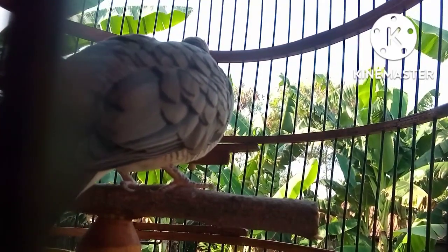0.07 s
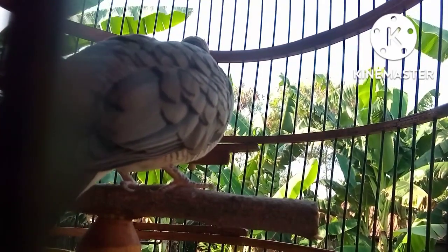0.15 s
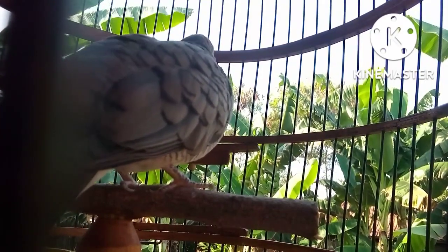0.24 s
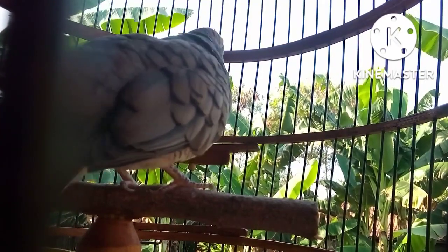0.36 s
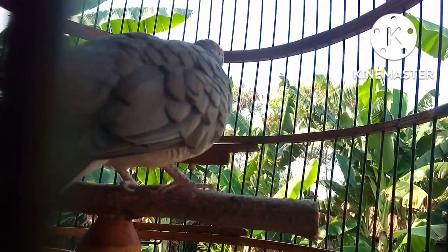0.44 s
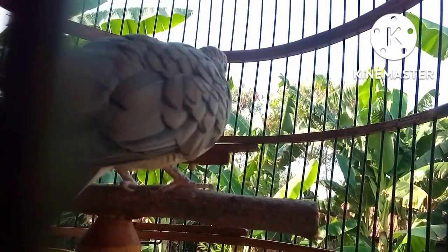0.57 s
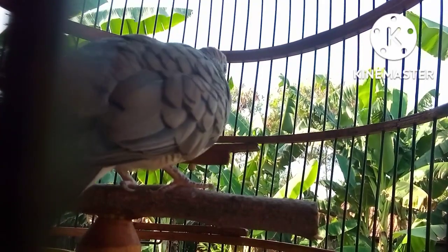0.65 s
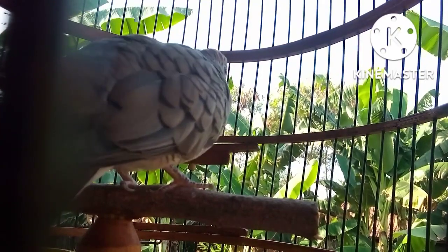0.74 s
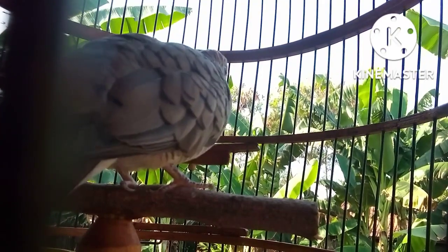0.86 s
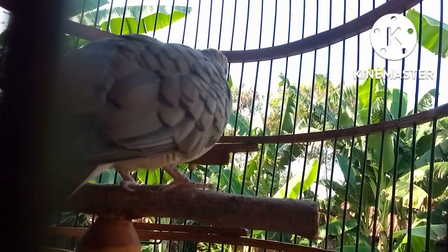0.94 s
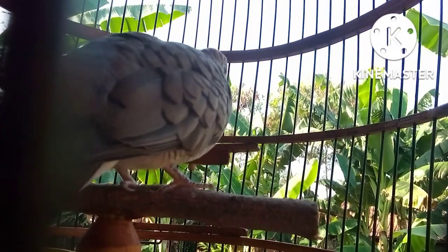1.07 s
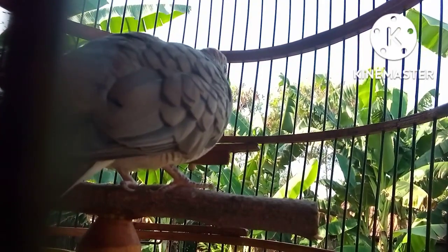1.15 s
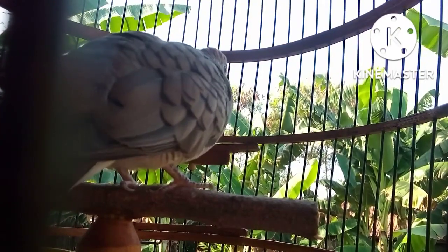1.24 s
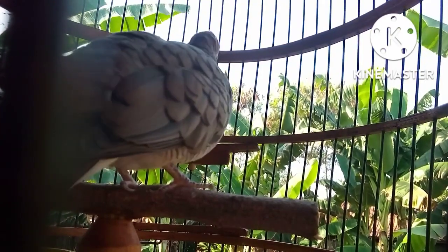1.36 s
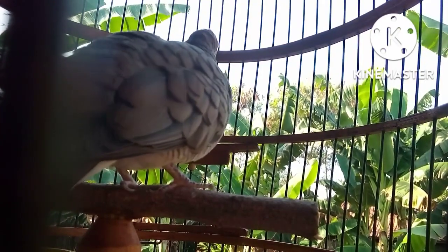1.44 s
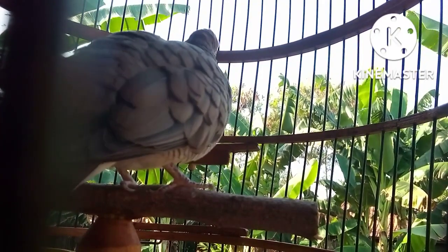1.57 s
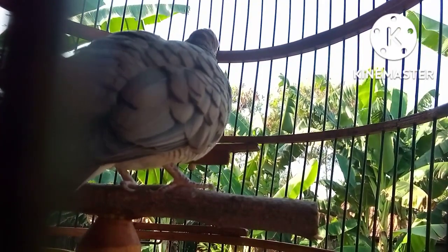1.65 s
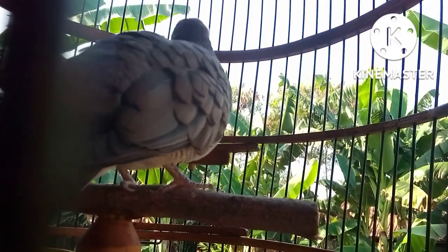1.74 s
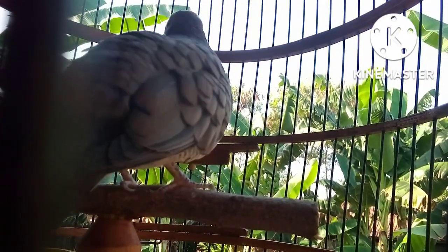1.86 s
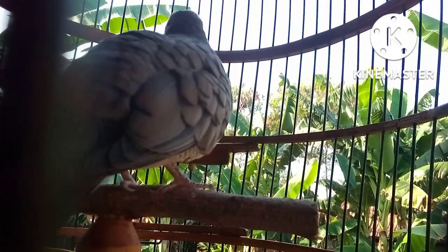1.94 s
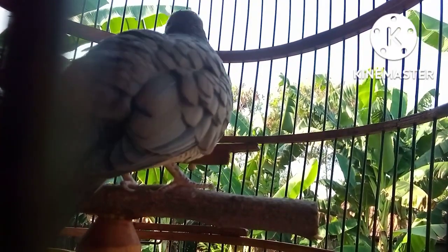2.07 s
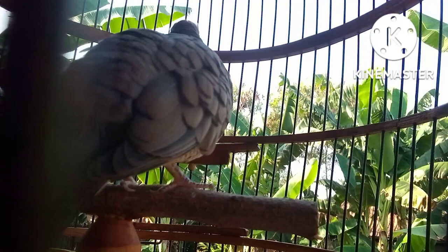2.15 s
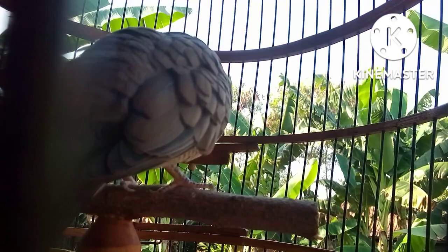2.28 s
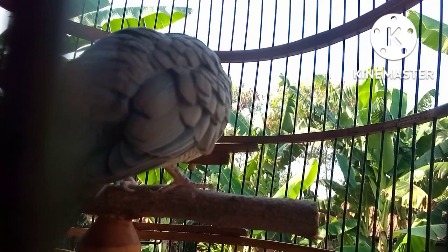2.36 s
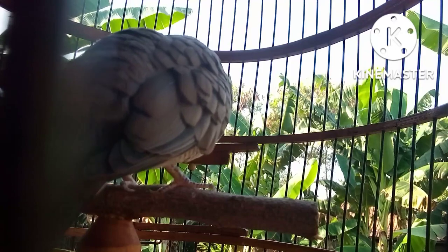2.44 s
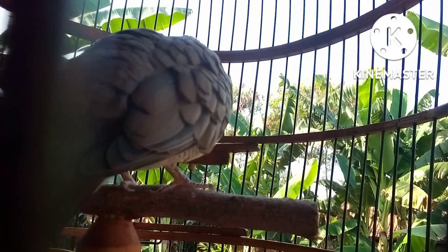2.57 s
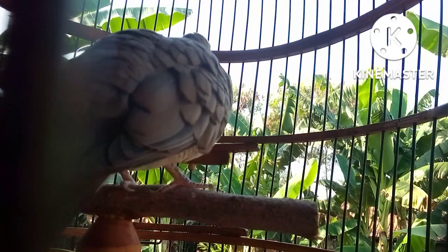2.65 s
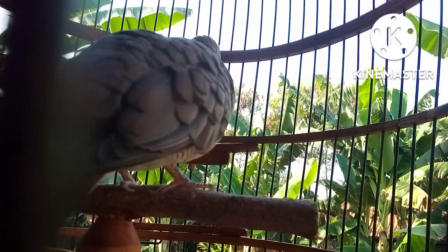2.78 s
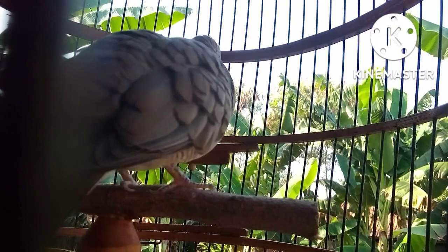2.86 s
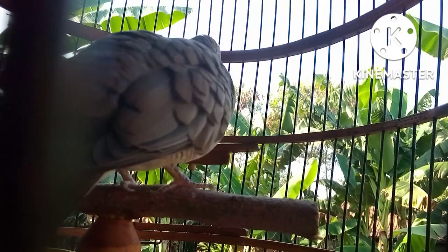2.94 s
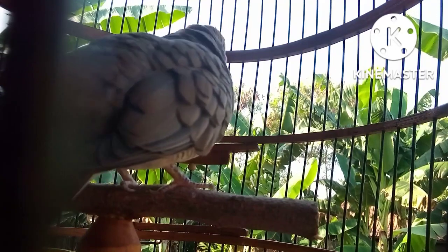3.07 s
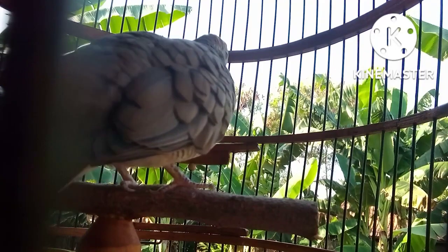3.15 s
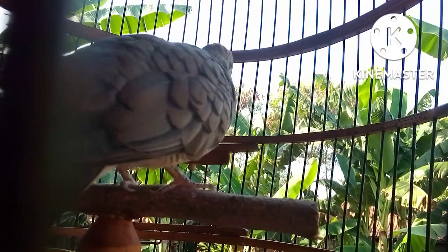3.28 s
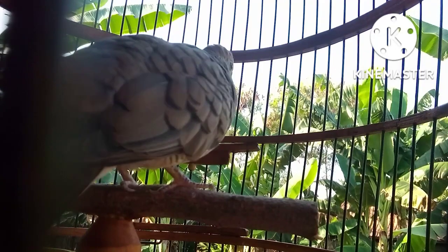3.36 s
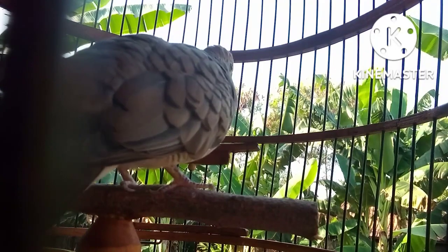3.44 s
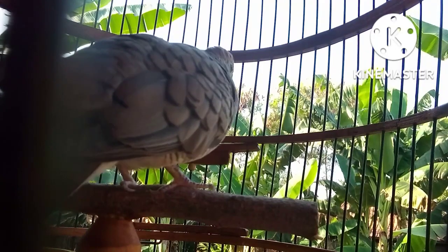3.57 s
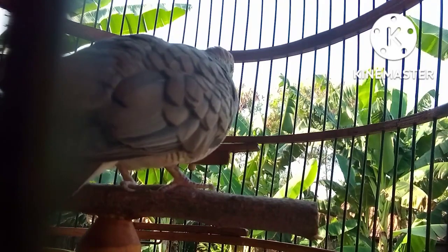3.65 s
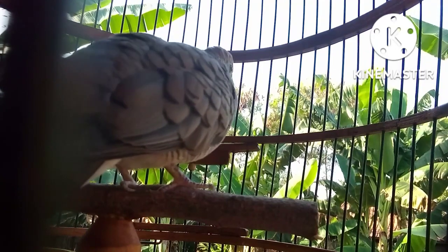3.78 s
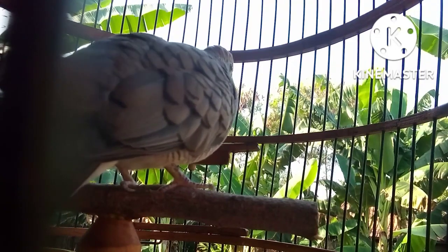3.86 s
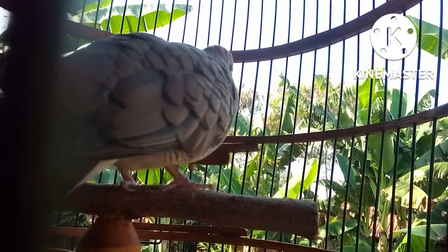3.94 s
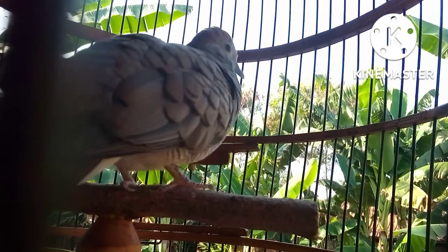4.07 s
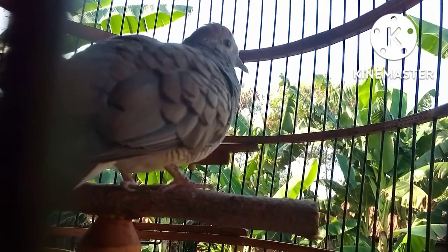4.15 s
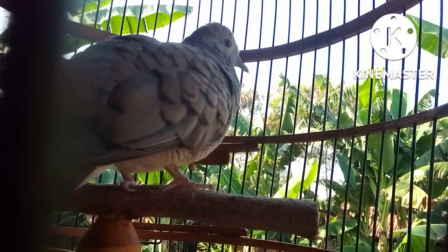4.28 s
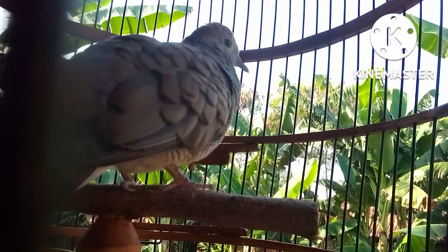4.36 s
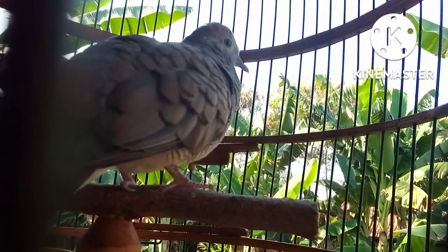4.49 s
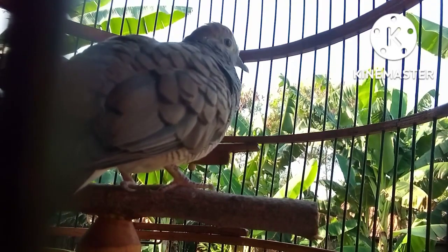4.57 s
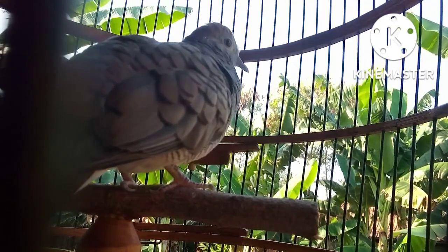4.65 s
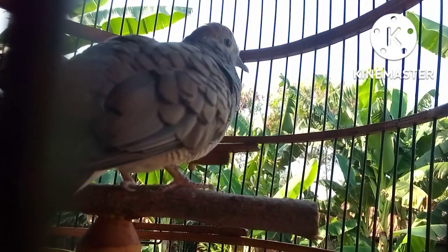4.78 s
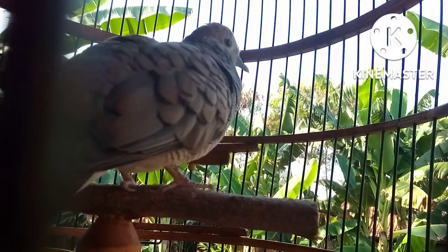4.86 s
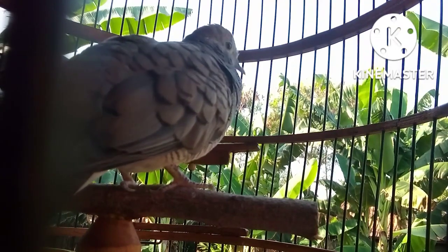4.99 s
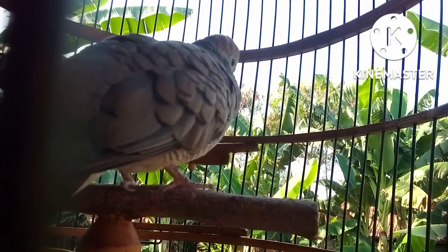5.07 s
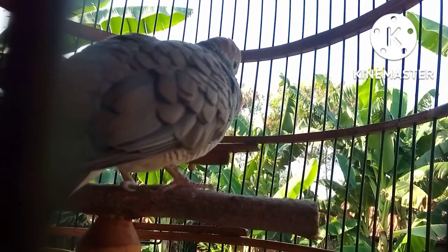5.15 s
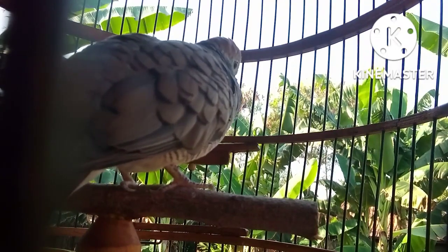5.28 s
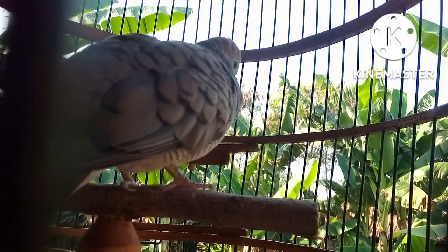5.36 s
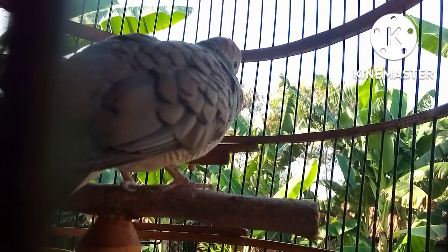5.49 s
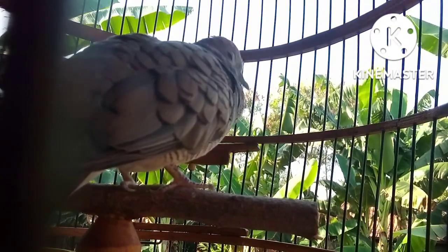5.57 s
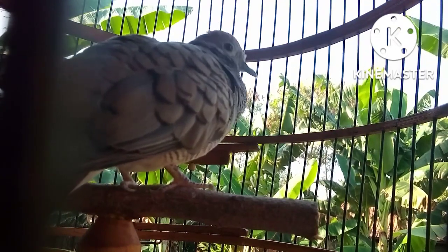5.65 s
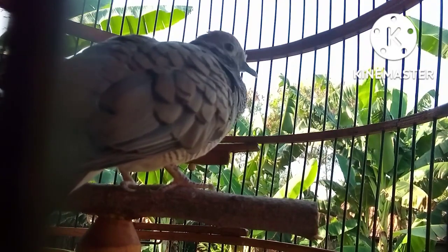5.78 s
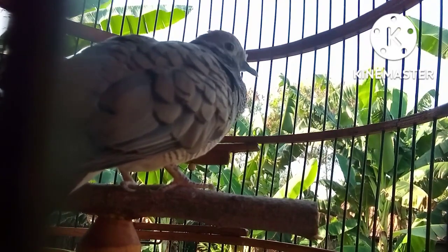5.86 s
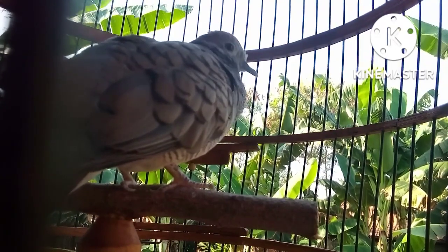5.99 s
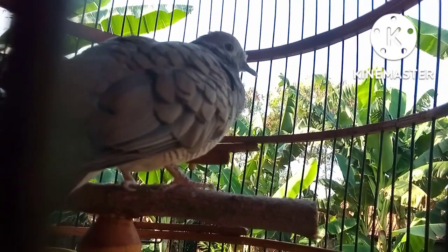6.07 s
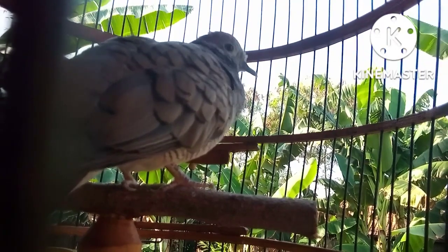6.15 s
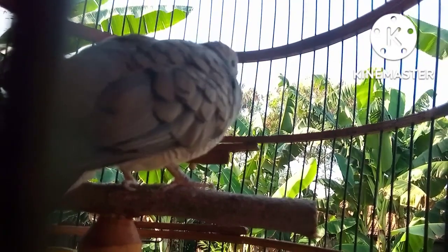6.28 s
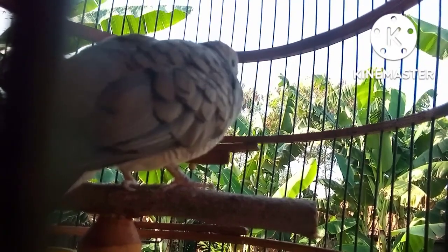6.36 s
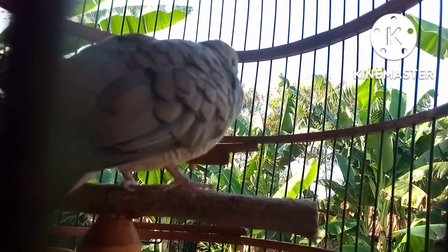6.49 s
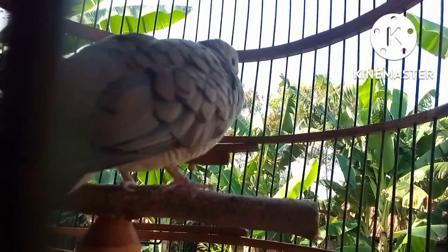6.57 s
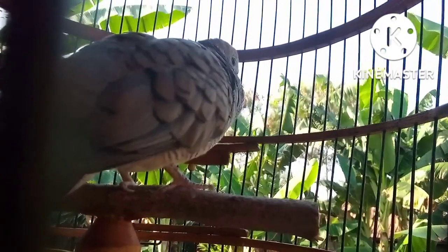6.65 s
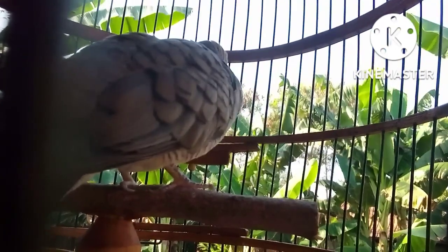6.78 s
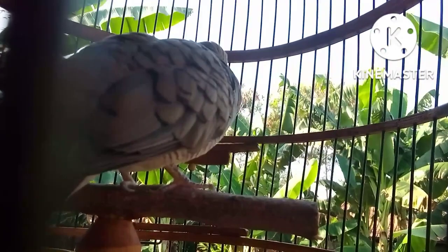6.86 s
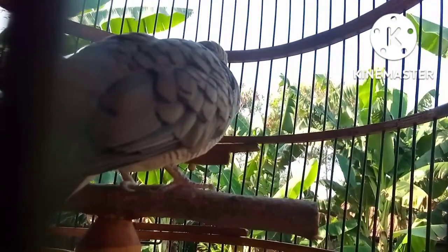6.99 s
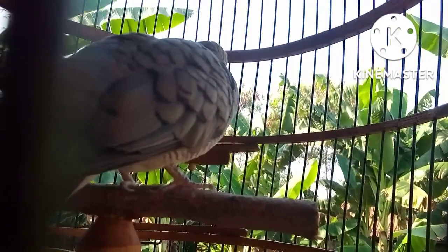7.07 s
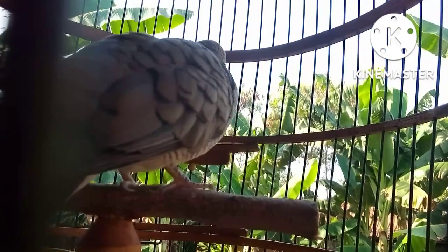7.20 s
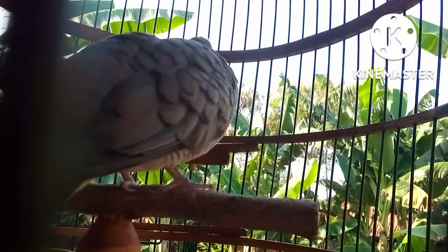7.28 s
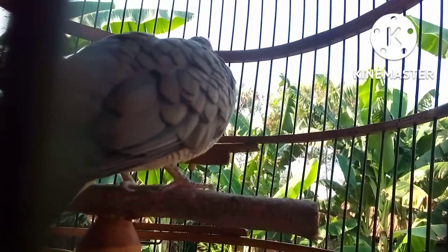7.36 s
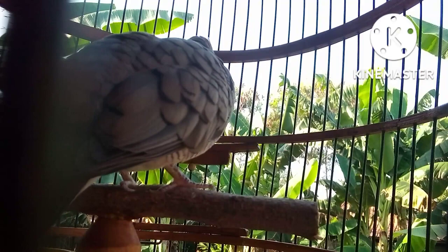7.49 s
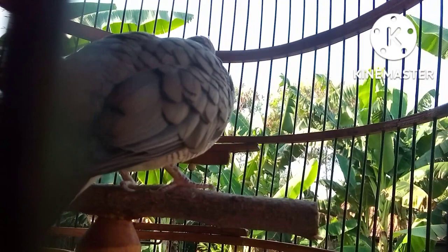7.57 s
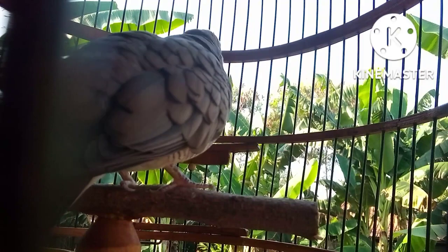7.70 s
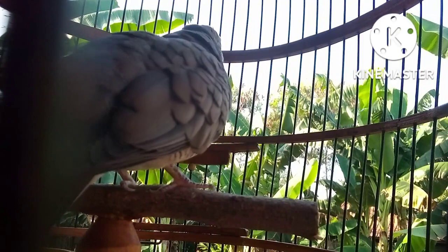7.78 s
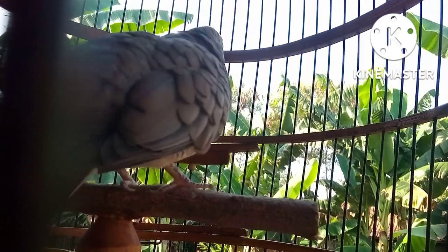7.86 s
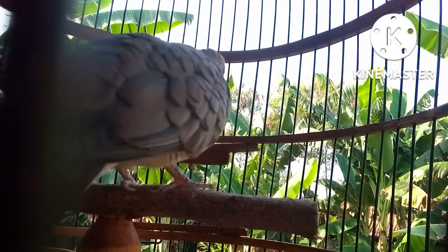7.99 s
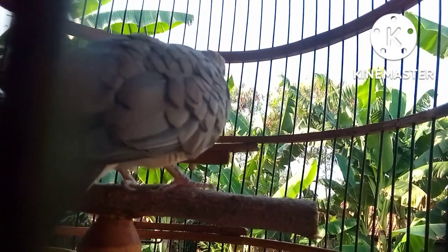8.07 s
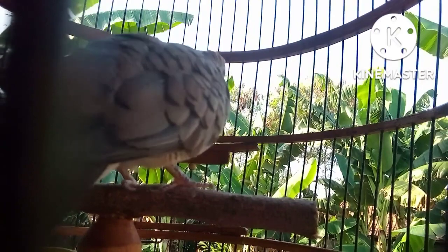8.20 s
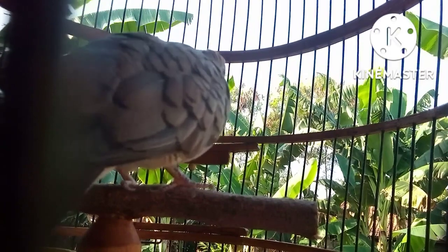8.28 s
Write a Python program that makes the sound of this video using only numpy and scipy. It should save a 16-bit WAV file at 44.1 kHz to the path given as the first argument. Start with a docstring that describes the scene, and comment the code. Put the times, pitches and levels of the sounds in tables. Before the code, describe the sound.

A caged dove coos close by in a garden, clearly the loudest sound. Its first phrase, a quick run of short, hollow, pulsing notes slowing at the end, lasts from about 0.5 to 1.3 seconds. A second runs from 3.3 to 4 seconds, and a third begins at 8 seconds, just before the end. Much fainter doves answer at about 1.1 to 1.7, 2.4 to 3, 5.6 to 6.2 and 7.8 seconds. Small birds scold and chirp faintly throughout, with a rapid chatter around 5 seconds and falling chirps from 7.2 to 7.9. A barely audible rooster crows far away from 1.4 to 3.2 seconds, and two soft taps on wood come near 2.3. Another rooster crows faintly and hoarsely across the yard from 5.8 to 7.6 seconds. Underneath, distant traffic rumbles quietly with a thin hiss of leaves and insects.

```python
"""In a garden, a caged dove coos close by and other doves answer from further off. Each coo flips between a low
and a high voice and rings in the bird's puffed-up throat. A cock crows across the yard with a hoarse, rattling,
breaking voice, and another far away. Small birds scold and whistle in the trees, something taps twice on wood,
and distant traffic rumbles under a thin, high hiss."""
import sys
import numpy as np
from scipy import signal
from scipy.fft import rfft, irfft
from scipy.io import wavfile
from scipy.ndimage import uniform_filter1d

SR = 44100
rng = np.random.default_rng(int(sys.argv[2]) if len(sys.argv) > 2 else 0)


def store_pcm(level_fs):
    """Save levels as 16-bit WAV."""
    pcm = np.round(np.clip(level_fs, -1, 1) * 32767).astype(np.int16)
    wavfile.write(sys.argv[1], SR, np.atleast_2d(pcm).T)


N = 367353
T = np.arange(N) / SR

# Dove notes. Each row: time of the flip to the high voice in seconds, time held in ms
# (None if it slides into the next note), top pitch in Hz, level in dB.
NEAR_COOS = [(.559, 45, 1265, -20), (.612, 29, 1230, -21), (.653, 19.6, 1214, -18.5),
             (.704, 16.5, 1168, -19.5), (.761, 14.7, 1150, -18), (.828, 17.5, 1153, -18),
             (.912, 23.7, 1186, -18.5), (1.011, 72, 1218, -19), (1.205, 69, 1206, -20),
             (3.291, None, 1264, -21), (3.338, 47.5, 1224, -22), (3.39, 23.5, 1202, -20),
             (3.437, 19, 1172, -19.5), (3.492, 9.1, 1100, -18), (3.559, 12.6, 1121, -17),
             (3.636, 23, 1168, -18.5), (3.73, 71.7, 1203, -19.5), (3.971, 61, 1185, -20.5),
             (8.036, None, 1299, -20), (8.081, 43, 1228, -21.5), (8.125, 25, 1231, -19),
             (8.172, 19.3, 1175, -18.5), (8.229, 13.2, 1133, -18.5), (8.297, 13, 1131, -18)]
FAR_COOS = [(1.1, 65, 1244, -39.5), (1.335, 19.2, 1111, -36), (1.41, 18.8, 1076, -34.5),
            (1.493, 15.3, 1120, -34), (1.625, 54, 1160, -39.5), (2.42, None, 1233, -39.5),
            (2.465, 51, 1195, -37), (2.535, 40, 1053, -37.5), (2.69, 9.2, 1064, -39.5),
            (2.79, 64, 1105, -39.5), (2.908, 37.5, 1163, -35.5), (5.602, None, 1228, -38),
            (5.655, 53.4, 1240, -39), (5.7, 31.6, 1250, -44.5), (5.75, 19.2, 1165, -41),
            (5.798, 18, 1118, -35), (5.862, 22, 1106, -33), (5.935, 20, 1095, -33), (6.02, 20, 1128, -36),
            (6.145, 43, 1194, -38), (7.795, 99, 1234, -39), (7.893, 30, 1207, -40), (7.95, 15, 1147, -42.5)]
# The dove's puffed-up throat. Each row: ringing pitch in Hz, width in Hz, gain in dB.
THROAT_SAC = [(995, 55, -1), (1210, 170, 0), (650, 300, -14)]
# Held notes of the cocks. Each row: start in seconds, length in seconds, pitch in Hz, first and last
# level in dB, gain of the lowest tone in dB, rattle from 0 to 1.
NEAR_CROW = [(5.885, .22, 812, -54, -70.5, -2.5, 0.77), (6.14, 0.041, 855, -71, -48.5, 1, 0.52),
             (6.18, .08, 972, -47.5, -50, -7, 0.44), (6.26, 0.074, 956, -63, -65.5, 1, 0.61),
             (6.37, 0.42, 843.8, -56, -57.5, 3.5, 0.53), (6.78, 0.094, 806, -66, -64, -18, 0.45),
             (6.89, 0.694, 790.5, -62, -53.5, -7.5, 0.07)]
FAR_CROW = [(1.4, .8, 415.8, -74.5, -74, -28, 0.26), (2.2, .6, 405.4, -73.5, -85.5, -27, .3),
            (2.9, .3, 355, -78.5, -78, -8, 0.34)]
# The crow breaks into noise. Each row: start in seconds, length in seconds, level in dB.
VOICE_BREAKS = [(5.81, 0.078, -57.5), (6.113, .05, -56.5), (6.221, .11, -59.5), (6.331, 0.055, -56.5),
                (6.74, 0.17, -60.5)]
# High rasps: small birds scolding and, from 5.85 to 7.2 seconds, the hoarse treble of the near crow.
# Each row: start in seconds, length in seconds, level in dB, brightness in dB per octave.
HIGH_RASPS = [(.005, 0.022, -67, 4), (.15, 0.021, -69.5, 2.5), (.38, .06, -77, 2.5),
              (1.35, 0.046, -60.5, -3.5), (1.42, 0.11, -61.5, 2.5), (1.58, 0.17, -68.5, -3.5),
              (1.742, 0.063, -63.5, -5.5), (1.84, .17, -62, -5.5), (2.064, .06, -62, -3),
              (2.14, 0.063, -61.5, -3), (3.16, 0.23, -74, 8), (3.43, .08, -62, -6), (3.8, 0.074, -75, 2.5),
              (3.905, .06, -62.5, 4), (4.02, 0.13, -67, -8), (4.142, 0.039, -59, -3.5),
              (4.23, 0.093, -65.5, -3.5), (4.315, .13, -61, -3.5), (4.46, 0.075, -63, -3.5),
              (5.76, 0.035, -75, -12), (5.85, 0.28, -63.5, 1), (6.13, .17, -64.5, 2.5),
              (6.4, .24, -59.5, -2), (6.65, 0.16, -56.5, -2), (6.84, 0.21, -61.5, -3),
              (7.0, 0.14, -62.5, -2), (7.265, .06, -70, 5.5), (7.385, 0.048, -70, 5.5),
              (7.52, .15, -74, 0.5), (7.7, 0.095, -68.5, 2.5), (7.93, 0.041, -77.5, 9)]
# Single chirps. Each row: start in seconds, length in ms, first and last pitch in Hz, level in dB,
# harshness from 0 to 1.
CHIRPS = [(1.589, 55, 3634, 2890, -59, 0.6), (3.815, 36, 4620, 4583, -60, .6),
          (4.14, 40, 8700, 8360, -77, 0.67), (4.168, 33.5, 4200, 4010, -58, 0.62),
          (5.31, 31, 8700, 8400, -73.5, 0.44), (5.82, 89, 3746, 3270, -60, 0.5),
          (5.83, 130, 2480, 2480, -59.5, .3), (5.91, 98, 2470, 2300, -54.5, 0.18),
          (6.13, 63, 3300, 3583, -61, 0.1), (6.335, 46, 2265, 2270, -63, 0),
          (6.938, 15, 2850, 2700, -60, 0), (7.217, 48, 4300, 4230, -52, 0.34)]
# Short bird calls. Each row: ms from the call's time, then the same columns as for a chirp.
SHRIEK_NOTES = [(0, 49, 5000, 4550, 4, .9), (10, 70, 3500, 3050, 0.5, 0.6)]  # two harsh voices sweeping down
SONG_NOTES = [(-33, 51, 3600, 3250, -9, 0.092), (-1.5, 8.5, 3180, 3010, 3.5, 0.09),
              (16.5, 36, 3800, 2500, -3, .15), (118.5, 40, 2330, 2220, -5, .05)]  # four falling notes
# When those calls come. Each row: time in seconds, level in dB.
SHRIEK_TIMES = [(1.42, -53.5), (3.43, -58.5)]
SONG_TIMES = [(7.372, -52), (7.53, -53), (7.784, -51)]
# Taps on wood. Each row: time in seconds, strength in dB.
KNOCKS = [(2.309, -59), (2.358, -58.5)]
# How the wood rings. Each row: pitch in Hz, width in Hz, gain in dB.
WOOD_RINGS = [(1178, 67, 4.5), (1550, 130, -5.5), (2670, 500, -6.5)]
# A low engine note comes and goes. Each row: time in seconds, relative level in dB.
ENGINE_LEVELS = [(0, -52.5), (.8, -59), (1.2, -67), (3.6, -60), (3.8, -46), (4.3, -55.5), (7.8, -64.5),
                 (8.1, -59.5), (8.33, -58)]
# Tone colours. Each row: frequency in Hz, relative strength there in dB.
DOVE_OVERTONES = [(2000, -23.5), (2450, -35.5), (3000, -28.5), (3600, -46), (4200, -37.5), (4850, -37.5),
                  (6100, -35), (6800, -23.5), (7300, -37), (8500, -53), (10000, -59), (15000, -71.5)]  # what leaks past the closed beak
BREATH_COLOUR = [(300, -46.5), (750, 3), (1000, 1), (1300, 3.5), (1900, -27), (2600, -47), (6500, -35.5),
                 (9000, -70)]  # air before a coo
NEAR_COCK_THROAT = [(1100, 11), (1700, 3.5), (2400, -14.5), (3150, -13.5), (3380, -2.5), (4200, -73),
                    (5500, -24), (6900, -23), (8000, -43), (9300, -38.5), (12000, -48)]
FAR_COCK_THROAT = [(400, 21), (830, -3.5), (1250, -5.5), (1650, -8.5), (2100, -25.5), (4000, -25.5)]
CROW_RASP_COLOUR = [(500, -25), (800, 0.5), (1200, -9), (1900, -10), (2450, -4.5), (2750, -21.5),
                    (3500, -9.5), (4300, -29), (7000, -21.5), (9000, -46)]
HIGH_RASP_COLOUR = [(760, -35.5), (1300, -41), (1360, -19.5), (1760, -12.5), (2240, -17), (2370, -16),
                    (3560, 2), (4490, -0.5), (5380, 4.5), (6690, -1.5), (7350, -6.5), (9560, -48),
                    (16200, -120)]
TRAFFIC_COLOUR = [(15, -49.5), (25, -38), (47, -6), (130, 3), (383, -11.5), (554, -19), (634, -19),
                  (738, -36.5), (790, -20.5), (859, -31), (1400, -45), (1820, -65.5), (3080, -120)]
HISS_COLOUR = [(900, -30.5), (1500, -12.5), (2400, -18.5), (3400, -21), (5400, -14), (6270, -2.5),
               (7350, -21), (9500, -23.5), (14200, -34), (14700, -12.5), (15600, -20.5)]  # a thin, high hiss


def dove(coos, lead_level, catch_ms, breath_db, overtone_db):
    """Each note starts low, flips up, arches and drops back; the throat sac rings through each flip."""
    pitch, effort, closure, breath = np.full(N, 900.), np.zeros(N), np.zeros(N), np.zeros(N)
    last_end = 0
    next_starts = [coo[0] for coo in coos[1:]] + [N]
    for (start, held_ms, top_hz, db), next_start in zip(coos, next_starts):
        slides = held_ms is None
        held = next_start - start if slides else held_ms / 1000
        before_ms, after_ms = 1000 * (start - last_end), 1000 * (next_start - start - held)
        last_end = start + held
        # The low lead-in grows with the pause before it, the low tail with the held part.
        lead = max(min(catch_ms + 2.6 + .1 * before_ms, 35, before_ms / 2), .1) / 1000
        tail = max(min(10.5 + 100 * held, after_ms / 2), .1) / 1000
        span = slice(round((start - lead - .03) * SR), round((last_end + tail + .0091) * SR))
        t = T[span] - start
        progress, onset = t / held, -lead - .003

        rise_hz = 50 if before_ms < .1 else 40.2
        droop_hz = (60.13 + 1200 * held) * (.7 if slides else 1)
        high_hz = top_hz - np.where(progress < .3, rise_hz * (1 - progress / .34) ** 2,
                                    droop_hz * ((progress - .3) / .66) ** 2)
        low_hz = np.interp(t, [onset, onset + .006, -.12 * lead, 0, held, held + .3 * tail, held + tail],
                           [790, 955, 1020, 1070, 1020, 950, 950 - 24000 * tail])
        note_hz = np.where((progress > 0) & (progress < 1), high_hz, low_hz)
        pitch[span] = np.where(t < -lead, pitch[span], note_hz)

        # A long lead-in is stronger, and so is a tail before a long pause.
        lead_gain, tail_gain = lead_level + 8 * lead, min(.014 * after_ms, 1.3)
        outline = [(onset, 0), (min(.011 - lead, -.3 * lead), lead_gain), (-.1 * lead, lead_gain),
                   (0, 1), (.91 * held, .95), (held, .95 if slides else .45),
                   (held + .25 * tail, tail_gain), (held + .5 * tail, .31 * tail_gain),
                   (held + tail + .0019, 0)]
        swell = np.interp(t, *np.transpose(outline))
        overshoot = np.where(t > 0, .23 * np.exp(-np.abs(t) / .006), 0) * min(lead / .00326, 1)
        effort[span] = np.maximum(effort[span], amp(db) * (swell + overshoot))
        # The voice membranes close hard only in the high voice, so the overtones flare there.
        hardness = np.interp(t, [-lead - .001, -.001, .001, .35 * held, .69 * held, held, held + .0043],
                             [0, .25, .6, 1, .8, .7 if slides else .15, 0])
        closure[span] = np.maximum(closure[span], amp(db) * hardness)
        # Air rushes just before the membranes catch, more before a long lead-in.
        rush = np.interp(t, [-lead - .028, -lead - .005, -lead + .019], [0, 1, 0]) ** 2
        breath[span] += amp(db + breath_db) * rush * lead / .035

    pitch, effort = uniform_filter1d(pitch, size=70), uniform_filter1d(effort, size=110)
    phase = 2 * np.pi * np.cumsum(pitch) / SR
    active, flicker = np.nonzero(closure)[0], drift(35)
    shaky_phase = phase[active] + .045 * drift(250)[active]  # blurs the overtones
    out = resonate(effort * np.sin(phase), THROAT_SAC)
    out += breath * coloured(rng.standard_normal(N), BREATH_COLOUR)
    for k in range(2, 13):
        flicker_db = 3 * np.roll(flicker, k * SR // 3)[active] * (k > 2)  # each flickers on its own
        gain = amp(at_hz(DOVE_OVERTONES, k * pitch[active]) + overtone_db + flicker_db)
        out[active] += closure[active] * gain * np.sin(k * shaky_phase)
    return out


def cock(notes, breaks, throat, rattle_hz):
    """A rattling, wavering tone is shaped by the throat; at each break the voice turns to noise."""
    out, rasp = np.zeros(N), coloured(rng.standard_normal(N), CROW_RASP_COLOUR)
    waver, wander = drift(61), drift(3)
    for start, length, hz, first_db, last_db, lowest_db, rattle in notes:
        span, progress, fade = crow_outline(start, length)
        # A clear note swells and sinks more than a rattling one.
        throb_db = 1.5 * (1 - rattle) * np.cos(2 * np.pi * progress * length / .261)
        pitch = hz * (1 + .002 * wander[span] + .018 * rattle * waver[span])
        phase = 2 * np.pi * np.cumsum(pitch) / SR
        overtones = sum(amp(at_hz(throat, k * hz)) * np.sin(k * phase + k * k) for k in range(2, 13))
        overtones *= 1 + rattle * np.sin(2 * np.pi * rattle_hz * T[span] + .98 * waver[span])
        tone = np.sqrt(2) * (overtones + amp(lowest_db) * np.sin(phase))
        voice = tone + amp(-18.5) * rattle * rasp[span]
        out[span] += fade * amp(first_db + (last_db - first_db) * progress + throb_db) * voice
    for start, length, db in breaks:
        span, _, fade = crow_outline(start, length)
        out[span] += fade * amp(db) * rasp[span]
    return out


def crow_outline(start, length, attack_s=.025, release_share=.06):
    """The samples of a crowed note, the share of it gone by, and its fade in and out."""
    span = slice(round(start * SR), round((start + length) * SR))
    t = T[span] - start
    progress = t / length
    return span, progress, np.clip(np.minimum(t / attack_s, (1 - progress) / release_share), 0, 1)


def high_rasps(attack_s=.0088, sag_db=4.5, release_db_per_s=300, chatter_step_s=.0737):
    """A fast, uneven buzz makes small birds' scolding and the hoarse treble of the near cock's crow."""
    buzz = coloured(rng.standard_normal(N) * amp(.97 * drift(120)), HIGH_RASP_COLOUR)
    # One run of evenly spaced notes swells and fades.
    chatter = [(start, .8 * chatter_step_s, -57 - 46.5 * (start - 4.985) ** 2, -1.5)
               for start in 4.572 + chatter_step_s * np.arange(12)]
    level, brightness = np.zeros(N), np.zeros(N)
    for start, length, db, db_per_octave in sorted(HIGH_RASPS + chatter):
        span = slice(round(start * SR), round((start + length + .2) * SR))
        t = T[span] - start
        fall_db = sag_db * np.minimum(t / length, 1) + release_db_per_s * np.maximum(t - length, 0)
        level[span] = np.maximum(level[span], amp(db - fall_db) * np.clip(t / attack_s, 0, 1))
        brightness[span] = db_per_octave
    out, edges_hz, flicker = 0, np.geomspace(1200, 11000, num=11), drift(15)
    for k, (low, high) in enumerate(zip(edges_hz, edges_hz[1:])):
        band = signal.sosfilt(signal.butter(2, [low, high], "band", fs=SR, output="sos"), buzz)
        octaves = np.log2(np.sqrt(low * high) / 5000)
        out += band * amp(brightness * octaves + 1.5 * np.roll(flicker, k * SR // 2))
    return level * rms_one(out)


def whistling_birds():
    """Short, gliding pure tones; the harsh ones are shaken by fast noise."""
    out, shake, notes = np.zeros(N), drift(410), list(CHIRPS)
    for times, call in [(SHRIEK_TIMES, SHRIEK_NOTES), (SONG_TIMES, SONG_NOTES)]:
        for start, db in times:
            for offset_ms, ms, first_hz, last_hz, note_db, harsh in call:
                notes.append((start + offset_ms / 1000, ms, first_hz, last_hz, db + note_db, harsh))
    for start, ms, first_hz, last_hz, db, harsh in notes:
        n, at = round(ms * SR / 1000), round(start * SR)
        glide = np.sin(2 * np.pi * np.cumsum(np.linspace(first_hz, last_hz, n)) / SR)
        roughness = 1 - harsh + harsh * shake[at:at + n]
        out[at:at + n] += amp(db) * glide * np.sqrt(np.hanning(n)) * roughness
    return out


def wood_knocks():
    """Soft taps make wood ring briefly and dully."""
    clicks = np.zeros(N)
    for start, db in KNOCKS:
        clicks[round(start * SR)] = amp(db + 45.5)
    taps = signal.sosfilt(signal.butter(4, 1500, fs=SR, output="sos"), clicks)
    return resonate(taps, WOOD_RINGS)


def traffic_and_hiss():
    """Far traffic swells slowly and an engine comes and goes, under a thin, high hiss."""
    rumble = coloured(rng.standard_normal(N), TRAFFIC_COLOUR) * amp(-57 + 1.2 * drift(2))
    engine = rms_one(resonate(rng.standard_normal(N), [(97, 53, 0)]))
    engine *= amp(np.interp(T, *np.transpose(ENGINE_LEVELS)) - 11)
    hiss = coloured(rng.standard_normal(N), HISS_COLOUR) * amp(-83.5 + 1.5 * drift(7.1))
    return rumble + engine + hiss


def garden_echo(x, echo_db, decay_s):
    """Walls and trees scatter the sound, adding a tail that falls 60 dB in decay_s."""
    t = T[:SR]
    tail = rng.standard_normal(SR) * amp(-60 * t / decay_s) * np.minimum(t / .017, 1)
    return x + amp(echo_db) * signal.fftconvolve(x, tail / np.sqrt(np.sum(tail ** 2)))[:N]


def resonate(x, rings):
    """Let x ring at several pitches side by side; a narrower one rings longer."""
    out = 0
    for hz, width_hz, db in rings:
        r = np.exp(-np.pi * width_hz / SR)
        feedback = [1, -2 * r * np.cos(2 * np.pi * hz / SR), r * r]
        out += amp(db) * signal.lfilter(np.array([1, 0, -1]) * (1 - r * r) / 2, feedback, x + 1e-18)
    return out


def coloured(x, colour):
    """Give x a tone colour and an average strength of 1."""
    hz = np.maximum(np.arange(N // 2 + 1) * SR / N, 1)
    return rms_one(irfft(rfft(x) * amp(at_hz(colour, hz)), N))


def at_hz(colour, hz):
    """Look up a tone colour's dB at any frequency, blending between its rows."""
    row_hz, row_db = np.transpose(colour)
    return np.interp(np.log(hz), np.log(row_hz), row_db)


def drift(rate_hz):
    """A smooth random wobble with a typical size of 1."""
    r = np.exp(-2 * np.pi * rate_hz / SR)
    return rms_one(signal.lfilter([1], [1, -2 * r, r * r], rng.standard_normal(N + SR))[SR:])


def rms_one(x):
    """Scale x to an average strength (rms) of 1."""
    return x / np.sqrt(np.mean(x ** 2) + 1e-20)


def amp(db):
    """Turn decibels into a multiplier."""
    return 10 ** (np.asarray(db) / 20)


def scene():
    """Mix everything into one channel; the near dove has the least echo."""
    near = dove(NEAR_COOS, lead_level=1, catch_ms=.19, breath_db=-13, overtone_db=-2.5)
    near = garden_echo(near, echo_db=-18.5, decay_s=.35)
    far = dove(FAR_COOS, lead_level=.9, catch_ms=6.1, breath_db=-21, overtone_db=-18.5)
    far = garden_echo(far + wood_knocks(), echo_db=-5, decay_s=.43)
    cocks = cock(NEAR_CROW, VOICE_BREAKS, NEAR_COCK_THROAT, rattle_hz=42.04)
    cocks += cock(FAR_CROW, [], FAR_COCK_THROAT, rattle_hz=30)
    yard = garden_echo(cocks, echo_db=-7, decay_s=.5)
    rasps = garden_echo(high_rasps(), echo_db=-8.5, decay_s=.15)
    whistles = garden_echo(whistling_birds(), echo_db=0, decay_s=.45)
    return (near + far + yard + rasps + whistles + traffic_and_hiss())[None]


def record(dry, cutoff_hz=15500):
    """Cut away the very highest treble."""
    return signal.sosfilt(signal.ellip(10, .5, 70, cutoff_hz, fs=SR, output="sos"), dry)


dry = scene()
out = record(dry)
store_pcm(out)
```